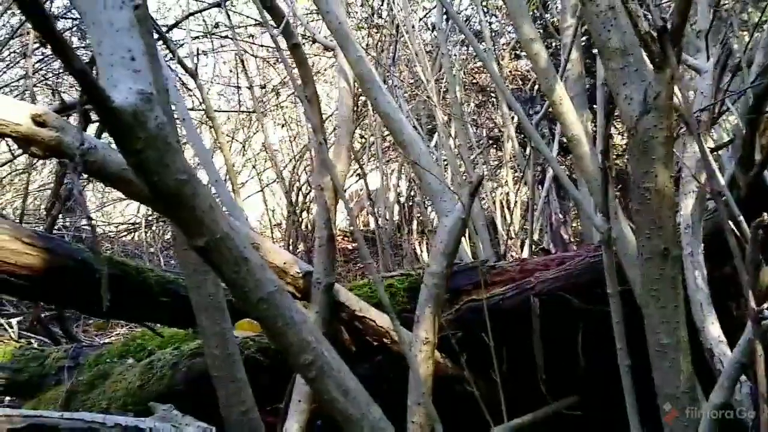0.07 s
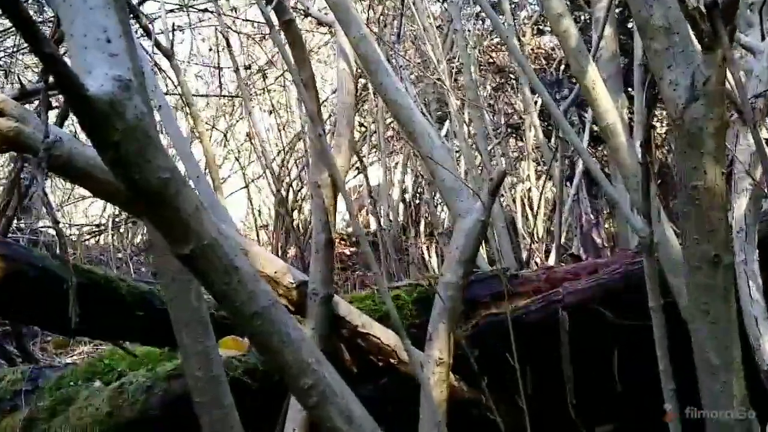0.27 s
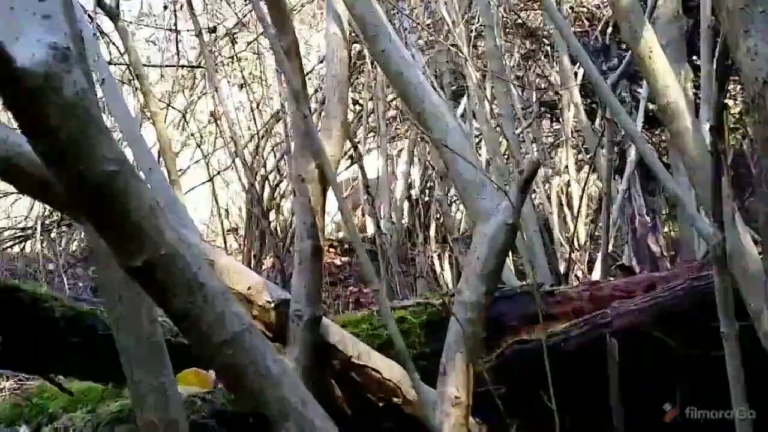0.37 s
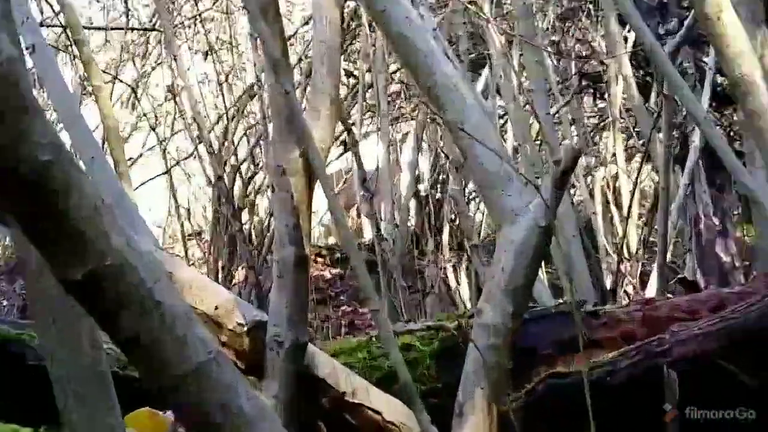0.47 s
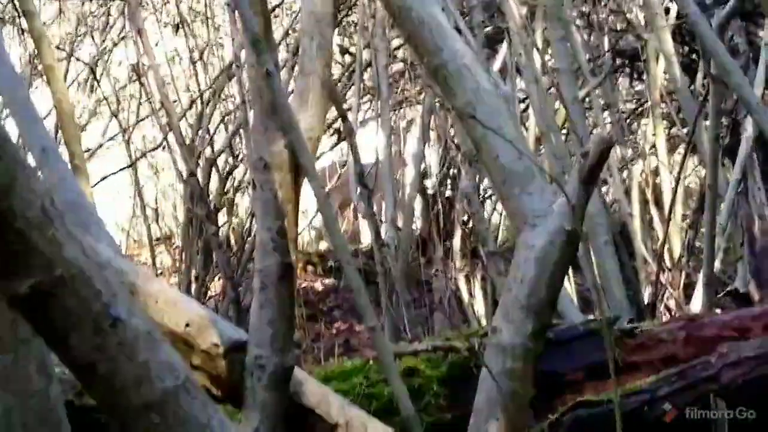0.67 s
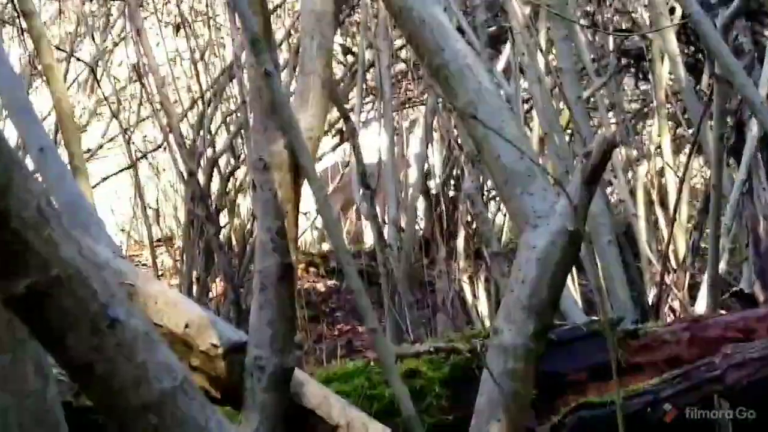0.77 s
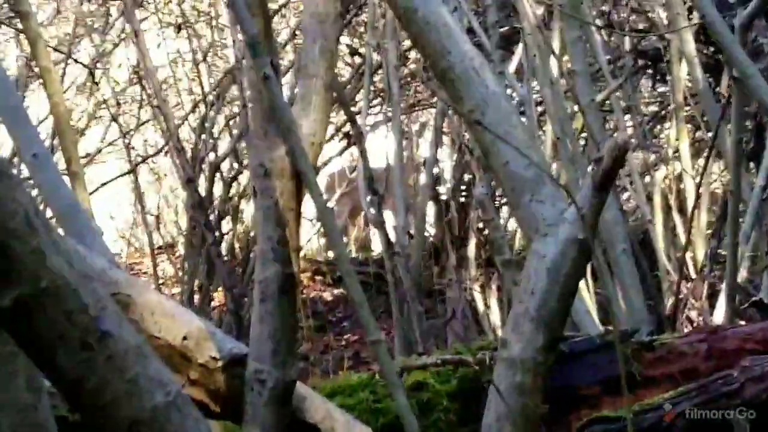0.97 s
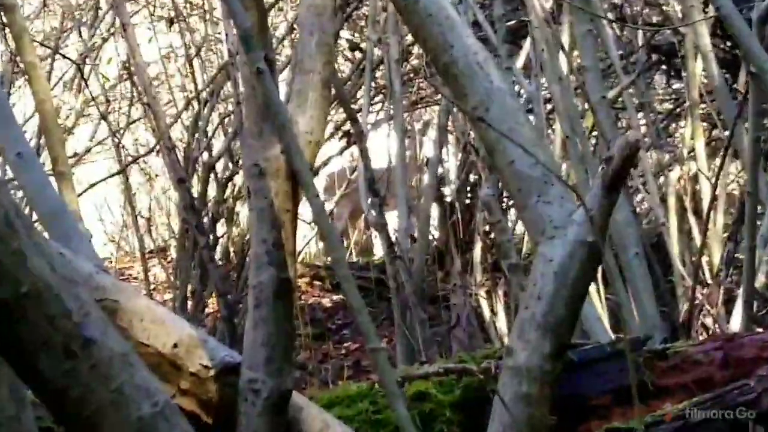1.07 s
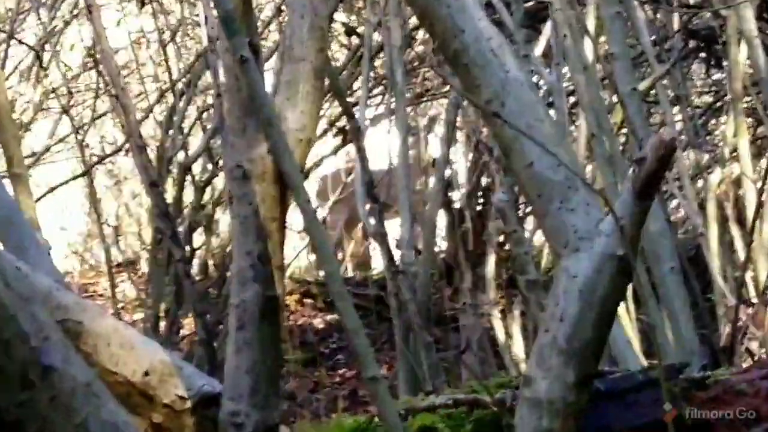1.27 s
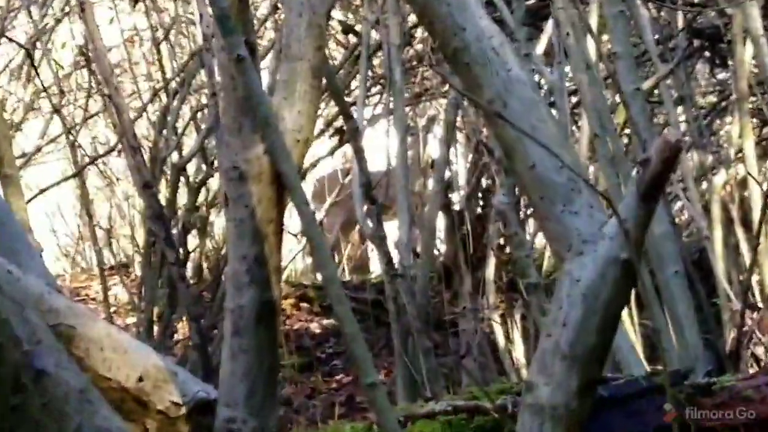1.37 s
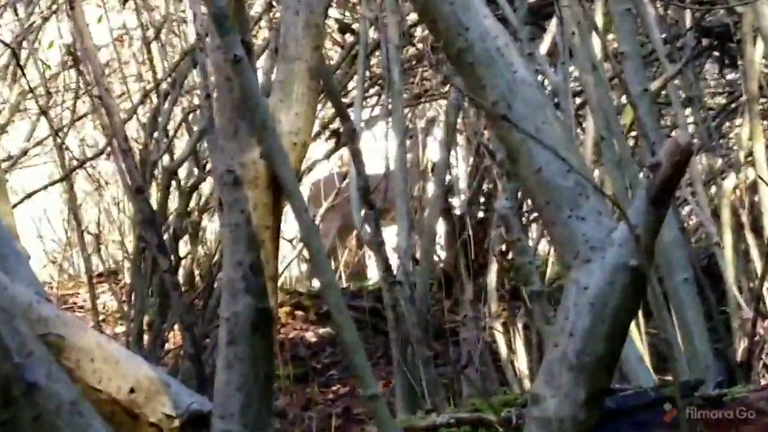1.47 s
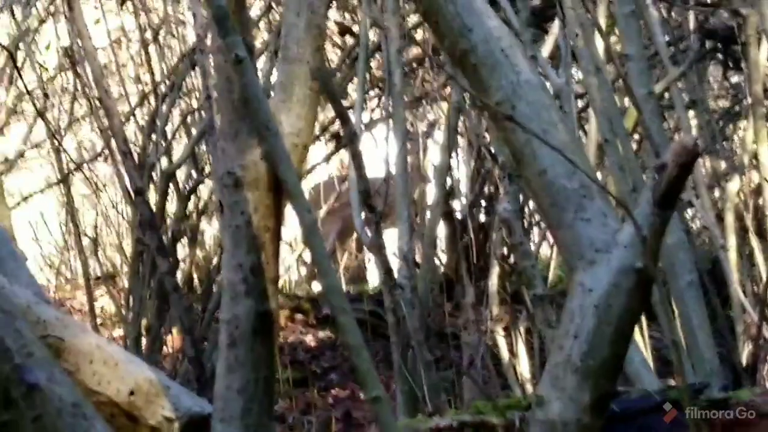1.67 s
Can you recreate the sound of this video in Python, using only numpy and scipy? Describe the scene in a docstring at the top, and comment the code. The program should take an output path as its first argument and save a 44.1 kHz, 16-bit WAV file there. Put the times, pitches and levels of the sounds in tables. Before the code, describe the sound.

Handling noise: sharp knocks and dull rubs on the right, over brief dry leaf rustle in woods

```python
"""Dry leaves swish and crackle, a twig cracks and a stick gives a hollow tock, as a hand-held camera moves by.
Fingers rub and knock at the right microphone port, before and after a brief dropout.
A low hum and a thin whine, probably the lens drive, swell near 0.9 s over rumble and still air.
Leaves and rubs are coloured random grains; knocks and bumps are pressure pulses; wood, case and
snaps are decaying sine modes; hum and whine are gliding sines; rumble and air are shaped noise."""
import sys
import numpy as np
from scipy import signal
from scipy.fft import rfft, irfft
from scipy.io import wavfile
from scipy.ndimage import uniform_filter1d

SR = 44100
rng = np.random.default_rng(int(sys.argv[2]) if len(sys.argv) > 2 else 0)


def output_pcm(signal):
    """Save a mono or channel-first signal as 16-bit PCM at the path in sys.argv[1].

    Samples are clipped to [-1, 1] before scaling.
    """
    pcm = np.clip(np.atleast_2d(signal).T, -1, 1) * 32767
    wavfile.write(sys.argv[1], SR, np.round(pcm).astype(np.int16))


N = 77175
T, HZ = np.arange(N) / SR, np.fft.rfftfreq(N, 1 / SR)


def amp(db):
    """Decibels to gain."""
    return 10 ** (np.asarray(db) / 20)


def unit(x):
    """Scales to rms 1."""
    return x / np.sqrt(np.mean(x ** 2) + 1e-20)


def follow(table):
    """Interpolates each column of a curve table at every sample."""
    time_s, *columns = np.transpose(table)
    return [np.interp(T, time_s, column) for column in columns]


def coloured(x, points):
    """Shapes the spectrum of x on a log-frequency axis; rms 1."""
    hz, db = np.transpose(points)
    gain = amp(np.interp(np.log(HZ + 1), np.log(hz), db))
    return unit(irfft(rfft(x) * gain, N))


def above(x, hz):
    """Zero-phase high-pass, gain 1/2 at hz; x minus this is the low part."""
    return irfft(rfft(x) * (1 - 1 / (1 + (HZ / hz) ** 4)), N)


def grains(per_s, spread_db):
    """Random one-sample clicks of either sign and uneven size."""
    size = amp(spread_db * np.minimum(rng.exponential(1, N), 4))
    sign = rng.choice([-1, 1], N)
    present = rng.random(N) < per_s / SR
    return size * sign * present


def patchy(x, patch_db):
    """The colour of a rough contact shifts: smoothed random gains over time and frequency."""
    spectrum = signal.stft(x, nperseg=256)[2]
    patches = rng.standard_normal(spectrum.shape)
    patches = uniform_filter1d(patches, size=3, axis=0)  # across frequency
    patches = uniform_filter1d(patches, size=6, axis=1)  # across time
    gain = amp(patch_db * unit(patches))
    return unit(signal.istft(spectrum * gain, nperseg=256)[1][:N])


def ring(start_s, modes):
    """Sine modes struck at one moment, each decaying 60 dB in its t60."""
    t = np.maximum(T - start_s, 0)
    return sum(amp(db - 60 * t / t60_s) * np.sin(2 * np.pi * hz * t) for hz, db, t60_s in modes)


# still air spectrum: (frequency [Hz], relative density [dB per Hz])
AIR_COLOUR = [(30, 8.5), (200, 5.5), (500, -4.5), (2000, -6.5), (13000, -20)]
AIR_DB = -76.5


def still_air():
    """Still air of the wood: steady shaped noise, independent at each port."""
    return amp(AIR_DB) * np.array([coloured(rng.standard_normal(N), AIR_COLOUR) for _ in range(2)])


# rumble envelope: (time [s], level [dB])
RUMBLE_LEVEL = [(0, -74), (.3, -51), (.6, -69.5), (1.1, -48.5), (1.45, -54), (1.6, -56.5), (1.75, -50.5)]
# rumble spectrum: (frequency [Hz], relative density [dB per Hz])
RUMBLE_SPECTRUM = [(45, -21.5), (73, 6), (95, -3.5), (150, 3.5), (190, -9.5), (260, -13.5), (1000, -63.5)]


def rumble():
    """Narrow low-frequency noise of changing level."""
    level_db, = follow(RUMBLE_LEVEL)
    return amp(level_db) * coloured(rng.standard_normal(N), RUMBLE_SPECTRUM)


# hum glide: (time [s], frequency [Hz], level [dB])
HUM_GLIDE = [(.56, 109.8, -66.5), (.82, 102.7, -56), (.855, 88.9, -44), (.89, 98.8, -35.5),
             (.925, 100.2, -36.5), (.96, 96, -53), (1.0, 102.4, -37.5), (1.06, 108.3, -59),
             (1.3, 112.6, -53.5), (1.75, 115.2, -61)]


def hum():
    """One gliding sine near 100 Hz."""
    hz, level_db = follow(HUM_GLIDE)
    return amp(level_db) * unit(np.sin(2 * np.pi * np.cumsum(hz) / SR))


# whine glide: (time [s], top line frequency [Hz], level [dB])
WHINE_GLIDE = [(.68, 12250, -82), (.725, 12900, -67), (.815, 12600, -86), (.85, 13100, -64.5),
               (.925, 13030, -58), (.98, 12270, -61), (1.09, 12530, -58.5), (1.24, 12330, -104)]
# whine lines, top line first: (relative level [dB])
LINE_LEVELS = [-3.5, -10.5, -17]
WHINE_SPACING_HZ, WHINE_WOBBLE_RMS_HZ = 3850, 20
FLUTTER_BAND_HZ, FLUTTER_RMS = 160, 0.55


def whine():
    """Three thin sines glide and waver together; low-passed noise roughens each one's amplitude."""
    hz, level_db = follow(WHINE_GLIDE)
    wobble = unit(uniform_filter1d(rng.standard_normal(N), size=150))
    hz = hz + WHINE_WOBBLE_RMS_HZ * wobble
    out = np.zeros(N)
    for k, line_db in enumerate(LINE_LEVELS):
        noise = rng.standard_normal(N)
        flutter = 1 + FLUTTER_RMS * unit(noise - above(noise, FLUTTER_BAND_HZ))
        phase = 2 * np.pi * np.cumsum(hz - k * WHINE_SPACING_HZ) / SR
        out += amp(line_db) * unit(flutter * np.sin(phase))
    return amp(level_db) * out


# twig modes: (frequency [Hz], relative level [dB], t60 [s])
TWIG_MODES = [(378, -4, 0.033), (1460, 2.5, 0.018), (1890, 1, 0.014), (2595, -10, 0.042)]
# stick modes: (frequency [Hz], relative level [dB], t60 [s])
STICK_MODES = [(824, 4, 0.012), (990, -10, 0.0052), (2760, -16, 0.016), (4440, -11.5, 0.018),
               (5730, -11, 0.02)]
TWIG_S, TWIG_DB = 0.097, -36.5
STICK_S, STICK_DB = 0.2953, -20
WOOD_RISE_S = 0.0014


def wood():
    """A twig cracks, then a thicker stick tocks: struck modes with a short rise."""
    out = np.zeros(N)
    for start_s, db, modes in [(TWIG_S, TWIG_DB, TWIG_MODES), (STICK_S, STICK_DB, STICK_MODES)]:
        rise = np.clip((T - start_s) / WOOD_RISE_S, 0, 1)
        out += amp(db) * rise * ring(start_s, modes)
    return out


# leaf spectrum, left port: (frequency [Hz], relative density [dB per Hz])
LEAF_COLOUR_LEFT = [(60, 3.5), (750, -9), (2000, 3.5), (7000, -2.5), (10000, 1.5), (12000, 5.5),
                    (13500, -5.5)]
# leaf spectrum, right port: (frequency [Hz], relative density [dB per Hz])
LEAF_COLOUR_RIGHT = [(60, 5), (1000, -0.5), (2000, 0.5), (5500, 7), (8000, -3.5), (10000, -6), (13500, -23)]
# leaf swish: (time [s], level [dB], sizzle gain [dB])
LEAF_SWISH = [(0, -65.5, 7.5), (.09, -56.5, -5), (.11, -52, -7), (.18, -49.5, 2), (.225, -39.5, 8.5),
              (.265, -50.5, -5.5), (.295, -36.5, 5.5), (.33, -42, -14.5), (.37, -48.5, -5), (.4, -58, -22),
              (.45, -44.5, -16), (.51, -58.5, -8), (.56, -100, -27)]
# leaf crackles: (time [s], level [dB], decay constant [s], sizzle gain [dB], right port gain [dB])
LEAF_CRACKLES = [(0.031, -50.5, 0.016, 9.5, -7.5), (.044, -46, 0.0054, 17.5, -12),
                 (0.096, -30, 0.0079, -2.5, -5), (0.409, -51, 0.0028, -11, 0), (0.42, -49, 0.0043, 9.5, -7)]
LEAF_GRAINS_PER_S, LEAF_GRAIN_SPREAD_DB, LEAF_PATCH_RMS_DB = 5000, 4, 6
SIZZLE_ABOVE_HZ, SWISH_RIGHT_DB, CRACKLE_RISE_S = 9000, -7.5, 0.00049


def leaves(colour, right):
    """Fine dry grains at one port: a swish and a few fast-dying crackles."""
    fizz = coloured(grains(LEAF_GRAINS_PER_S, LEAF_GRAIN_SPREAD_DB), colour)
    fizz = patchy(fizz, LEAF_PATCH_RMS_DB)
    sizzle = above(fizz, SIZZLE_ABOVE_HZ)
    level_db, sizzle_db = follow(LEAF_SWISH)
    out = amp(level_db + right * SWISH_RIGHT_DB) * (fizz + (amp(sizzle_db) - 1) * sizzle)
    for start_s, level_db, decay_s, sizzle_db, right_db in LEAF_CRACKLES:
        t = np.maximum(T - start_s, 0)
        envelope = np.minimum(t / CRACKLE_RISE_S, 1) * np.exp(-t / decay_s)
        grit = fizz + (amp(sizzle_db) - 1) * sizzle
        out += amp(level_db + right * right_db) * envelope * grit
    return out


# rub spectrum: (frequency [Hz], relative density [dB per Hz])
RUB_SPECTRUM = [(35, -28.5), (120, 11), (400, 2), (1000, 0), (2800, -9), (4500, -16), (8000, -18.5),
                (12000, -24), (14000, -43.5)]
# creep of the resting fingers: (time [s], level [dB])
FINGER_CREEP = [(.2, -80), (.4, -51), (.5, -52.5), (.66, -69), (.93, -59), (1.14, -58), (1.3, -58),
                (1.53, -62.5), (1.61, -81.5)]
# finger strokes: (start [s], length [s], level [dB], bass gain [dB], treble gain [dB])
RUB_STROKES = [(0.218, 0.052, -47, -9.5, -12), (0.234, 0.02, -29, 9, -11), (0.253, 0.093, -50, 13, -10),
               (0.321, 0.0096, -29.5, -5, 5.5), (0.331, 0.065, -35, -4, -2), (0.436, 0.041, -47, 0, 12),
               (0.568, 0.049, -31.5, -10, 1.5), (0.609, 0.018, -56, 5, 13),
               (0.637, 0.0093, -45.5, 0.5, -6.5), (0.856, 0.0072, -39.5, 9.5, 5.5),
               (0.86, 0.052, -44.5, 6, -7), (0.943, 0.046, -44, 1.5, -7), (0.973, 0.029, -29.5, -3, -4.5),
               (1.067, 0.03, -22, -5, -2.5), (1.09, 0.0087, -20, -30.5, 8), (1.096, 0.016, -30.5, 0, -3),
               (1.117, 0.0088, -31, -14.5, -17), (1.206, 0.0071, -34.5, -1.5, 10),
               (1.218, 0.028, -36.5, 2, -5.5), (1.329, 0.0089, -31, 4.5, 10.5), (1.344, 0.024, -29, 1.5, 1)]
SLIPS_PER_S, SLIP_SPREAD_DB, RUB_PATCH_RMS_DB = 7000, 3.5, 2.5
BASS_BELOW_HZ, TREBLE_ABOVE_HZ = 540, 4500
RUB_RISE, RUB_FALL = 0.15, 0.36  # fractions of stroke length


def rubs():
    """Skin sticks and slips on the case: dense dull grains in short strokes over a faint creep."""
    grit = coloured(grains(SLIPS_PER_S, SLIP_SPREAD_DB), RUB_SPECTRUM)
    grit = patchy(grit, RUB_PATCH_RMS_DB)
    treble = above(grit, TREBLE_ABOVE_HZ)
    bass = grit - above(grit, BASS_BELOW_HZ)
    body = grit - bass - treble
    creep_db, = follow(FINGER_CREEP)
    out = grit * amp(creep_db)
    for start_s, length_s, db, bass_db, treble_db in RUB_STROKES:
        u = (T - start_s) / length_s
        stroke = np.clip(np.minimum(u / RUB_RISE, (1 - u) / RUB_FALL), 0, 1)
        out += amp(db) * stroke * (body + amp(bass_db) * bass + amp(treble_db) * treble)
    return out


# hand bumps: (time [s], peak level [dB], width [ms])
HAND_BUMPS = [(0.2796, -15, 1.91), (0.4249, -29.5, 2.9), (0.441, -25.5, 2.1)]


def bumps():
    """Soft slow dents of pressure with a rebound either side."""
    out = np.zeros(N)
    for peak_s, db, width_ms in HAND_BUMPS:
        u = ((T - peak_s) * 1000 / width_ms) ** 2
        out -= amp(db) * (1 - 2 * u) * np.exp(-u)
    return out


# dry snaps: (time [s], level [dB], frequency [Hz], t60 [s])
DRY_SNAPS = [(1.4799, -15, 9200, 0.00067), (1.6698, -43.5, 4110, 0.0051), (1.67, -50.5, 756, 0.013)]


def snaps():
    """Tiny dry ticks, each one fast-decaying mode."""
    return sum(ring(start_s, [(hz, db, t60_s)]) for start_s, db, hz, t60_s in DRY_SNAPS)


# case rings, pitch set by where it is touched: (time [s], level [dB], frequency [Hz])
CASE_RINGS = [(0.2363, -23.5, 2880), (0.2387, -14.5, 1010), (.2452, -12, 1500), (.2450, -15.5, 2340),
              (1.0715, -27, 1060), (1.093, -22, 3130), (1.2079, -30, 2480), (1.2234, -26, 1410),
              (1.2299, -29.5, 2760), (1.3286, -22.5, 2715), (1.329, -37, 5469), (1.4812, -33.5, 1200)]
RING_RISE_S, RING_T60_S = 0.001, 0.012


def case_rings():
    """Short hollow rings of the camera case, one mode each."""
    out = np.zeros(N)
    for start_s, db, hz in CASE_RINGS:
        rise = np.clip((T - start_s) / RING_RISE_S, 0, 1)
        out += rise * ring(start_s, [(hz, db, RING_T60_S)])
    return out


# port knocks, before filtering: (peak time [s], peak pressure [push +, release -], half-height width [ms])
PORT_KNOCKS = [(0.2382, 0.79, .5), (.2393, 0.37, .6), (0.2403, 0.44, .36), (0.2425, -0.24, 2),
               (0.2449, 0.79, .28), (0.2457, -0.33, .33), (0.3263, .16, .37), (0.5939, 0.063, .18),
               (0.762, .024, 1.2), (.8110, 0.089, .4), (0.8315, -0.094, .5), (.8328, 0.028, 1),
               (.8336, 0.088, 0.31), (0.8525, 0.076, .64), (0.857, -0.1, .45), (0.9027, 0.083, .08),
               (0.9393, 0.062, .6), (0.9508, 0.069, .45), (0.9567, -0.1, .63), (0.9814, -0.27, .14),
               (1.0709, -0.27, .4), (1.0716, -0.67, .5), (1.0748, -0.33, .15), (1.092, -0.47, .2),
               (1.1211, 0.17, 0.3), (1.2079, 0.1, .45), (1.2086, 0.03, .12), (1.2246, -0.46, .28),
               (1.2315, 0.38, .55), (1.303, -.015, .55), (1.3319, -0.58, .58), (1.3525, -0.21, .9),
               (1.4176, -.015, .35), (1.4799, .15, .4)]
PORT_LOW_HZ = 105.3
KNOCK_TOP_HZ, KNOCK_TOP_DB = 3700, -9


def knocks():
    """Each knock is one rounded pressure pulse, its treble dulled; the port leaks the bass away."""
    out = np.zeros(N)
    for peak_s, pressure, width_ms in PORT_KNOCKS:
        rise_s = width_ms / 2450  # half-height width is 2.45 rise times
        u = np.clip((T - peak_s) / rise_s + 1, 0, 60)
        out += pressure * u * np.exp(1 - u)
    out = out - (1 - amp(KNOCK_TOP_DB)) * above(out, KNOCK_TOP_HZ)
    return signal.lfilter(*signal.butter(1, PORT_LOW_HZ, "high", fs=SR), out)


TOUCH_LEAK_DB = -37  # touch at the left port, relative to the right


def scene():
    """Touches land on the right port and leak left; whine is left only; the rest reaches both."""
    shared = rumble() + hum() + wood()
    touch = rubs() + bumps() + snaps() + case_rings() + knocks()
    left = leaves(LEAF_COLOUR_LEFT, False) + whine() + amp(TOUCH_LEAK_DB) * touch
    right = leaves(LEAF_COLOUR_RIGHT, True) + touch
    return still_air() + shared + np.array([left, right])


# dropout: (start [s], end [s])
DROPOUT_SPAN = (.517, .567)
DROPOUT_FADE_S, DROPOUT_DB = 0.0015, -28
BAND_EDGE_HZ = 13500


def record(dry):
    """The level drops briefly on both channels, then a linear-phase low-pass limits the band."""
    start_s, end_s = DROPOUT_SPAN
    shut = np.clip(np.minimum(T - start_s, end_s - T) / DROPOUT_FADE_S, 0, 1)
    low_pass = signal.firwin(255, BAND_EDGE_HZ, window=("kaiser", 8), fs=SR)
    return signal.oaconvolve(dry * amp(DROPOUT_DB * shut), low_pass[None], "same")


dry = scene()
out = record(dry)
output_pcm(out)
```